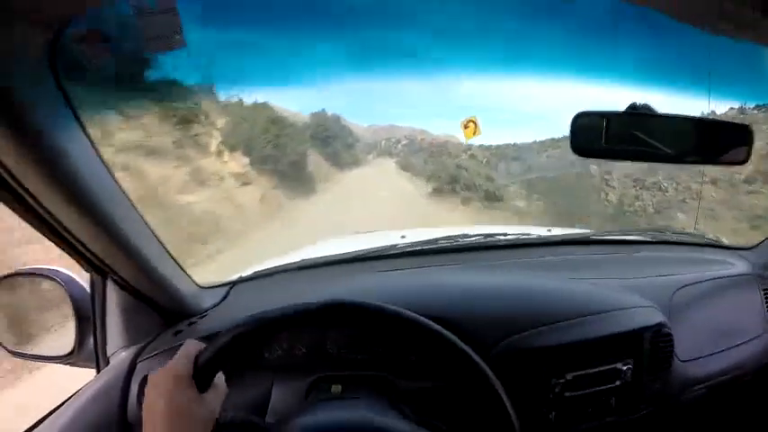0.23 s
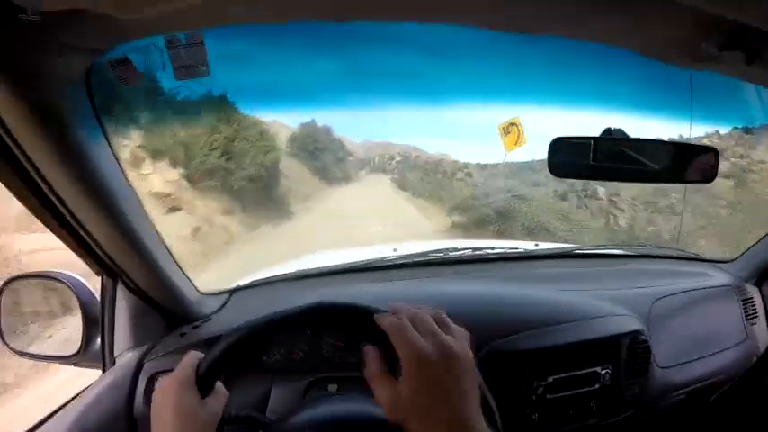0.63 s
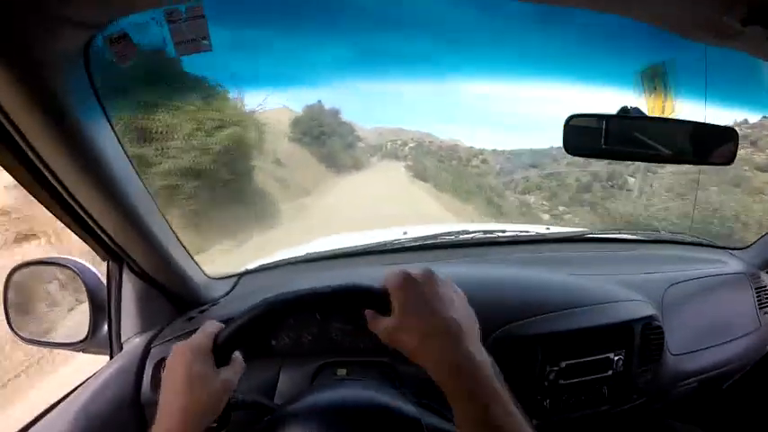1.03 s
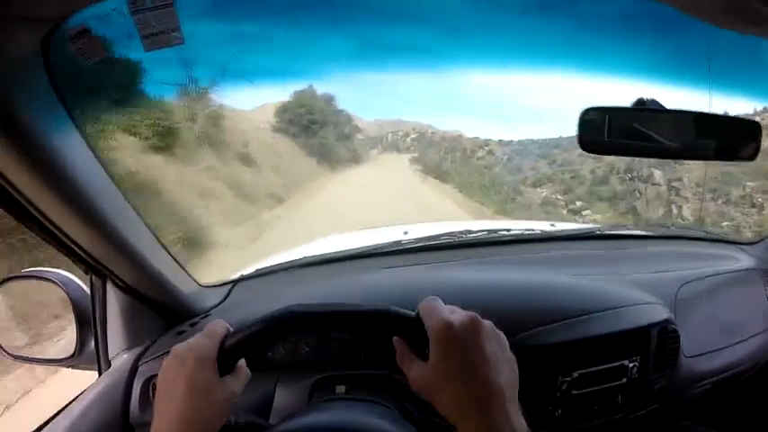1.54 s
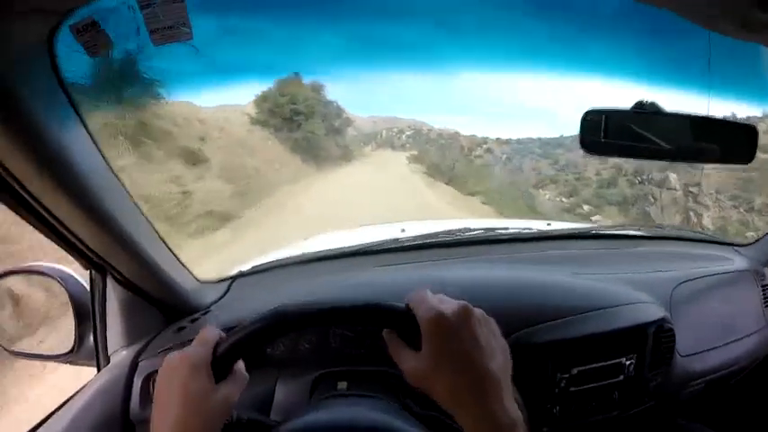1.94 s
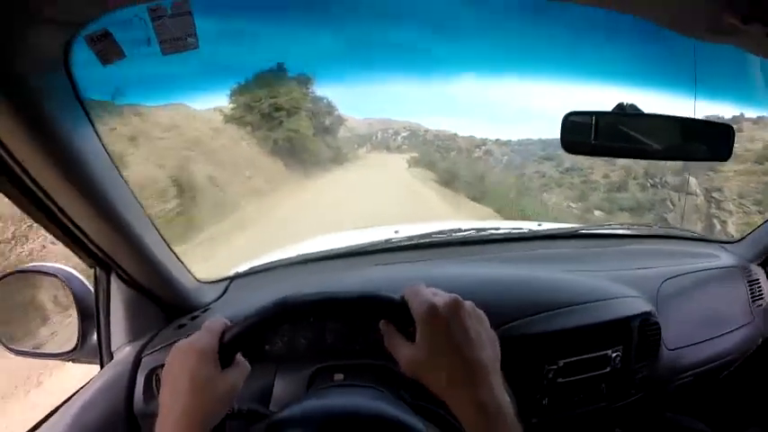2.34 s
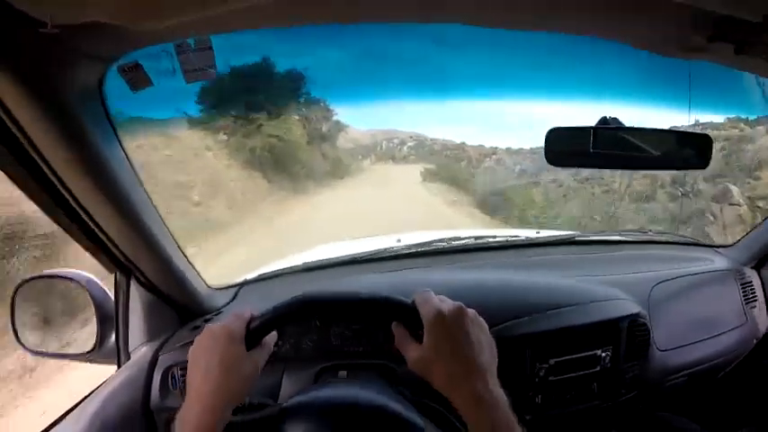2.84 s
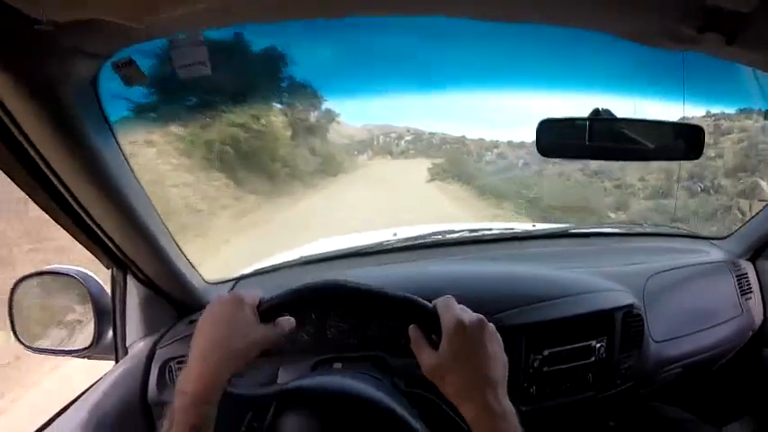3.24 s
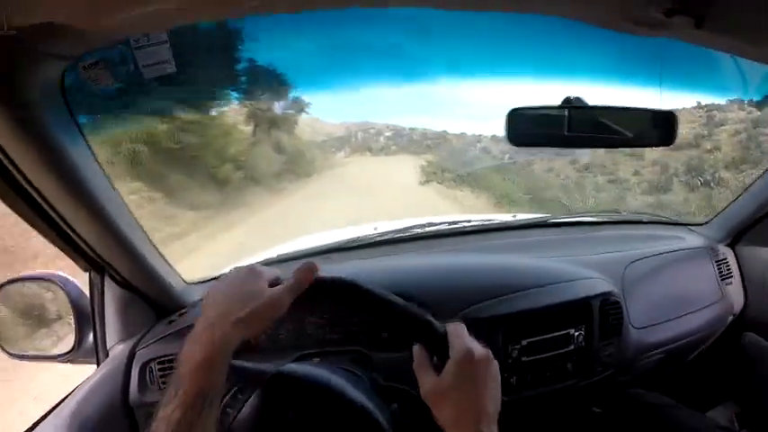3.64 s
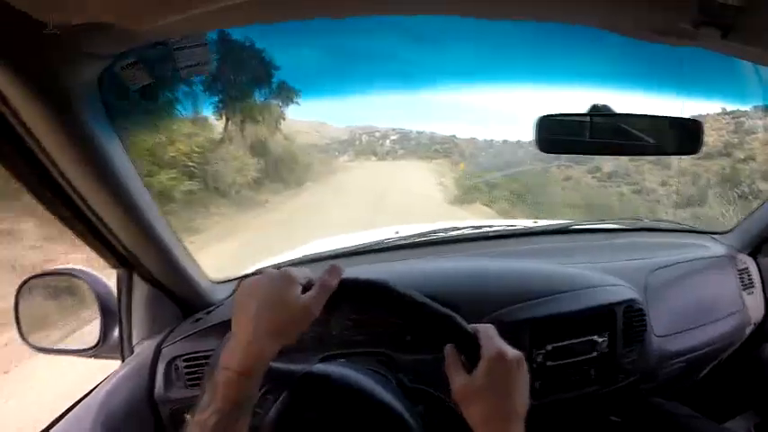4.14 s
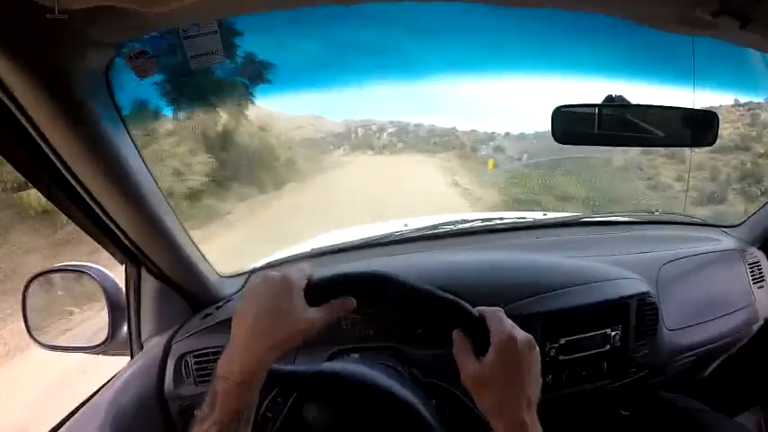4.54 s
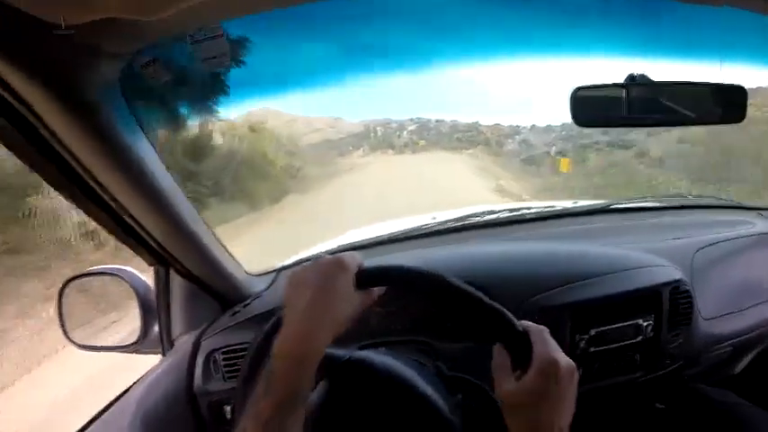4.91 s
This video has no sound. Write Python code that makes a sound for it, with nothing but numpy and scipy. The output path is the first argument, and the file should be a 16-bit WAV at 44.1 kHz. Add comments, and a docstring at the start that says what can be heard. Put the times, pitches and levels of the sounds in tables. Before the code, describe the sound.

Inside a pickup cab driving a dirt road, with a dry, close, bass-heavy sound. Low tyre rumble, muffled tread roar and faint gravel hiss run throughout, over a humming, slightly burbling engine and a swaying low body boom. A rut booms at 0.4 s; small metallic ticks and an occasional stone click follow. From 1.2 to 2 s comes the roughest patch: gravel roar swells, the body booms repeatedly, panels knock in a tight hollow clatter around 1.3-1.65 s, and dashboard plastic creaks and squeaks with fine crackling. Near 1.7-1.9 s the engine eases and drops in pitch. From 2 to 3.5 s it is calmer, with light ticks, a soft knock at 2.8 s and the engine rising slightly around 2.9 s. A strong boom hits at 3.6 s, then more at 3.9-4 s with short creaks. Knocks at 4.2, 4.6 and 4.9 s lead to a final run of creaks around 5 s.

```python
"""A plastic dashboard creaks in a pickup cab on a dirt road: noisy slip bursts ring resonances and carry a squeak.
Panels knock as resonant noise plus a sine; a loose part ticks, trim crackles in pings, stones click below.
An eight-cylinder engine hums in sine orders and sinks as it shifts up and eases off.
Ruts swell a low body boom, bumps drum the floor, and tyres rumble, roar and hiss as shaped noise."""
import sys
import numpy as np
from scipy import signal
from scipy.fft import rfft, irfft, next_fast_len
from scipy.io import wavfile
from scipy.ndimage import uniform_filter1d, minimum_filter1d, map_coordinates

SR = 44100
rng = np.random.default_rng(int(sys.argv[2]) if len(sys.argv) > 2 else 0)


def materialize(psi):
    """Save the field psi as 16-bit PCM at rate SR to the path in sys.argv[1].

    A 1-D psi becomes a single channel; in a 2-D psi each row is a channel.
    """
    bounded = np.clip(np.atleast_2d(psi).T, -1, 1)
    quanta = np.round(bounded * 32767).astype(np.int16)
    wavfile.write(sys.argv[1], SR, quanta)


N = 227952

# Ground under the tyres: t/s, tread roar level/dB, gravel hiss level/dB, axle rumble level/dB
ROAD_LEVELS = [(0, -32, -47.5, -25), (0.75, -33.5, -53, -23.5), (1.3, -28.5, -46.5, -21.5),
               (1.8, -32.5, -48, -24), (2.3, -35.5, -54.5, -23), (2.7, -37, -58, -24),
               (3.05, -34.5, -55, -24.5), (3.55, -35, -54, -26), (3.9, -34, -51.5, -22.5),
               (4.5, -35, -54.5, -25.5), (5.17, -34.5, -51, -23)]
# Loose gravel patches: t/s, length/s, rise of roar and hiss/dB
GRAVEL_PATCHES = [(1.453, 0.15, 5.5), (2.784, 0.034, 6), (3.535, 0.089, 5), (4, 0.15, 2.5), (4.59, 0.05, 3)]
GRAVEL_EDGE_S = 0.068
# Axle rumble spectrum: f/Hz, relative level/dB
RUMBLE_SPECTRUM = [(10, -60), (42, -11.5), (58, 3.5), (80, -2.5), (105, -5), (135, 1), (190, -5.5),
                   (260, -9), (350, -14.5), (500, -18.5), (900, -59), (2000, -120)]
# Tread roar spectrum, also the thud of knocks: f/Hz, relative level/dB
ROAR_SPECTRUM = [(150, -30.5), (330, 3.5), (480, 1), (650, 1), (820, 0.5), (990, 4.5), (1120, -1.5),
                 (1300, -8.5), (1700, -14), (2400, -17.5), (4000, -39), (8000, -62.5), (14000, -120)]
# Gravel hiss spectrum, also dry clicks: f/Hz, relative level/dB
HISS_SPECTRUM = [(700, -35), (2000, 4), (3300, 4), (5000, -1.5), (6500, -7), (8500, -14), (10000, -19),
                 (12000, -19.5), (15000, -50)]

# Steady rocking of the body: t/s, level/dB
ROCKING_LEVELS = [(0, -15), (0.2, -26.5), (0.5, -14.5), (2.0, -17), (2.35, -26.5), (2.5, -16.5),
                  (3.05, -18), (3.2, -24), (3.48, -22), (3.7, -12), (4.5, -12), (5.17, -18)]
# Ruts that make the body boom: peak t/s, level/dB
RUT_HITS = [(0.369, -9), (1.411, -8), (1.55, -6.5), (1.69, -8), (1.889, -9.5), (2.18, -22), (2.561, -17),
            (3.569, -4), (3.87, -9), (3.99, -5.5), (4.61, -7), (5.051, -11.5)]
RUT_RISE_DB_PER_S, RUT_FALL_DB_PER_S = 332, 136.5
# Body shudder spectrum: f/Hz, relative level/dB
SHUDDER_SPECTRUM = [
    (6, -25.5), (18, 7.0), (30, 2.0), (42, 5.0), (65, -7.5),
    (90, -14.0), (128, -12.0), (170, -20.0), (500, -66.5), (1000, -120)]
# Suspension bumps drumming the floor: t/s, level/dB, f/Hz
FLOOR_THUMPS = [(1.125, -18.5, 276), (1.46, -20, 303.3), (2.49, -26, 262), (4.05, -25, 306),
                (4.355, -23, 263)]

# Engine speed and load: t/s, cycle rate/Hz, level/dB
ENGINE_COURSE = [(0, 14.15, -28), (0.45, 14.25, -28), (0.75, 14.05, -28.5), (1.0, 13.75, -28),
                 (1.25, 13.4, -27.5), (1.55, 13.25, -27), (1.7, 12.9, -33), (1.87, 10.45, -35),
                 (2.3, 10.28, -36.5), (2.7, 10.2, -38), (2.9, 12.1, -39), (3.5, 11.7, -37),
                 (4.2, 11.05, -35), (5.17, 11.2, -38)]
# Orders from uneven cylinders: multiple of cycle rate, relative level/dB
BURBLE_ORDERS = [(4, 0), (5, 4), (6, -8), (7, -9.5), (9, -6), (10, -1), (11, 0.5), (12, -10), (13, -7),
                 (14, -13), (15, -8.5), (16, -12), (18, -12.5), (19, -15), (20, -18.5), (24, -18.5),
                 (27, -18), (29, -24.5)]
# Cab air resonances: f/Hz, width/Hz, gain/dB
CAB_AIR_MODES = [(114.13, 3.17, 10.5), (85.2, 4.9, 10.5)]
# Exhaust pipe resonances: f/Hz, width/Hz, gain/dB
PIPE_MODES = [(90.2, 4.4, 10.5), (250.6, 4.3, 6), (266, 6.3, 11)]

# Stones flicked at the underside: t/s, relative level/dB, ring f/Hz
STONE_HITS = [(0.219, -29, 3770), (0.996, -35.5, 3520), (2.0455, -36.5, 4086), (2.217, -34, 3510),
              (2.862, -36.5, 6800), (2.9482, -40.5, 5300), (3.547, -30, 3450), (4.598, -33, 3470)]
# Underfloor dulling: f/Hz, gain/dB
FLOOR_FILTER = [(7000, 0.5), (14000, -6)]

# Clear taps of the loose part: t/s, relative level/dB
CLEAR_TICKS = [(0.1394, -49), (0.379, -38.5), (0.516, -42), (0.551, -43.5), (0.589, -43), (0.613, -44),
               (0.782, -44), (0.9295, -38), (1.134, -34), (2.1, -41), (2.283, -42), (2.389, -45),
               (2.434, -43.5), (2.61, -42), (2.893, -45), (2.9725, -42), (3.087, -50), (3.133, -41),
               (3.236, -40.5), (3.272, -41.5), (3.518, -36.5), (3.7086, -41)]
FAINT_TICKS_PER_S, FAINT_TICK_DB = 6.3, -49.5
# Ring of the loose metal part: f/Hz, relative level/dB, t60/s
TRINKET_MODES = [(3220, 3, 0.03), (4430, -13.5, 0.014), (4960, -6.5, 0.018)]

# Panel knocks: t/s, relative level/dB, ring f/Hz, ring power share/1
PANEL_KNOCKS = [(0.997, -23, 1100, 0.7), (1.25, -22.5, 1060, 0.4), (1.285, -15.5, 933, 0.4),
                (1.341, -13.5, 1020, 0.8), (1.455, -18, 700, 0), (1.476, -7.5, 1095, .55),
                (1.5, -17.5, 1100, .3), (1.52, -8.5, 447, 0.5), (1.534, -15, 1150, 0.2),
                (1.549, -11.5, 1120, .4), (1.57, -13.5, 1105, 0.5), (1.617, -7.5, 1043, 0.7),
                (1.635, -13.5, 1116, .6), (2.785, -28.5, 1060, 0.6), (4.171, -20, 990, .4),
                (4.601, -21, 1105, 0.6), (4.878, -19.5, 995, 0.5), (5.088, -23, 1010, 0.6)]
# Padded panel resonances: f/Hz, width/Hz, relative level/dB
PANEL_MODES = [(302, 50, 6), (459, 97, 8.5), (730, 110, -2.5), (970, 71, 2.5), (1070, 56, 9.5),
               (1390, 110, -6.5), (1650, 130, -23.5)]

# Crackling of strained trim: t/s, length/s, relative level/dB
TRIM_STRAINS = [(1.238, 0.076, -41), (1.491, .13, -37), (1.638, 0.036, -46.5), (1.76, .11, -47.5),
                (4.967, .11, -44)]
# Crackle tone: f/Hz, gain/dB
CRACKLE_FILTER = [(700, -10), (1800, -3), (7000, -2.5), (14000, -13.5)]

# Dashboard creaks: t/s, rise/s, length before decay/s, relative level/dB, squeak f/Hz, squeak power share/1
CREAK_BURSTS = [(1.205, 0.026, 0.029, -27, 2335, 0.63), (1.243, 0.0036, .034, -37, 2290, .05),
                (1.281, 0.0089, .018, -30, 2038, 0.5), (1.319, .004, .009, -38, 2000, 0.5),
                (1.353, 0.0061, 0.023, -33.5, 2000, .15), (1.396, 0.014, 0.032, -33.5, 2350, 0.2),
                (1.443, 0.012, .023, -31.5, 2320, 0), (1.486, 0.0091, 0.027, -31.5, 3790, 0.5),
                (1.513, 0.0027, .024, -30.5, 3750, 0), (1.556, 0.0087, .02, -32.5, 3500, 0),
                (1.58, .005, 0.026, -35.5, 3750, 0.2), (1.603, 0.01, .018, -33, 2330, 0.4),
                (1.638, .01, 0.02, -30, 2330, .25), (1.661, 0.0033, 0.015, -37.5, 1990, .2),
                (1.705, 0.011, 0.016, -38.5, 3860, 0.2), (1.737, 0.0074, 0.019, -38, 3610, 0.3),
                (1.765, 0.0045, 0.023, -41, 3300, .12), (1.793, .012, 0.037, -40, 2530, .15),
                (1.829, 0.0064, 0.026, -35.5, 2450, .1), (1.853, 0.015, .018, -29.5, 3580, 0.1),
                (1.889, 0.021, 0.036, -37, 2290, 0.1), (1.96, 0.0082, .014, -33.5, 3450, .4),
                (3.941, 0.0037, 0.011, -36.5, 3535, 0.1), (3.967, .008, 0.013, -40.5, 2060, .15),
                (4.019, 0.0055, 0.011, -28, 1865, 0.4), (4.047, 0.0054, 0.021, -30.5, 2274, 0.4),
                (4.075, 0.0049, 0.017, -33.5, 2317, 0.3), (4.111, .003, .006, -46, 2230, 0.2),
                (4.168, 0.0038, 0.0074, -37.5, 3820, 0.3), (4.231, 0.0018, 0.0048, -39.5, 2200, .2),
                (4.251, .02, .027, -43, 3450, 0.2), (4.279, 0.011, .013, -32.5, 2014, 0.3),
                (4.319, .004, 0.0076, -40, 2180, .1), (4.353, .003, .007, -44, 2130, 0),
                (4.459, 0.0024, .007, -44, 2100, 0.3), (4.483, 0.0037, 0.0077, -44.5, 2130, .2),
                (4.838, 0.0016, .007, -44, 3800, 0), (4.86, 0.0072, 0.014, -41, 3930, 0.15),
                (4.894, .003, 0.0052, -43.5, 3730, 0), (4.929, .012, 0.02, -36, 2010, .2),
                (4.963, 0.0063, 0.022, -28.5, 2000, 0.6), (4.998, 0.0065, .016, -32, 3710, 0.4),
                (5.016, 0.01, 0.027, -34.5, 3900, .22), (5.047, 0.018, 0.025, -30, 3960, 0.4),
                (5.119, 0.0068, 0.02, -29.5, 2320, .13), (5.157, .005, .012, -37.5, 3690, 0.07)]
# Dashboard plastic resonances: f/Hz, width/Hz, mean level/dB
DASH_MODES = [(2060, 210, -1), (2270, 89, 2.5), (3290, 320, 0), (3705, 320, 7.5), (4000, 60, -4.5),
              (4640, 130, 4), (5360, 72, -11), (6330, 200, -17), (6820, 130, -7), (7980, 170, -10.5),
              (8500, 170, -17), (11830, 220, -31)]
# Rubbing plastic spectrum: f/Hz, relative level/dB
SCRAPE_SPECTRUM = [(400, -33), (1100, 8.5), (2200, 9.5), (2800, 0), (4200, -8.5), (6000, 0.5), (8300, -1),
                   (10000, -19), (12200, -23.5), (14000, -20), (15500, -42)]
# Dashboard tone: f/Hz, gain/dB
DASH_FILTER = [(5000, -1.0), (8000, -3.1), (12200, -1.5), (14000, -8), (15500, -27)]

TOP_HZ = 15200


def amp(db):
    """Decibels to gain."""
    return 10 ** (np.asarray(db) / 20)


def unit(x):
    """Scale to rms 1."""
    return x / np.sqrt(np.mean(x ** 2) + 1e-20)


def curves(rows):
    """Interpolate each column after the time to one value per sample."""
    s, *cols = np.transpose(rows)
    return [np.interp(np.arange(N) / SR, s, col) for col in cols]


def wobble(knots_per_s):
    """Smooth random curve through normally distributed knots."""
    knots = rng.standard_normal(int(N * knots_per_s / SR) + 4)
    return map_coordinates(knots, [np.arange(N) * knots_per_s / SR])


def sine(phase):
    """Sine of rms 1."""
    return np.sqrt(2) * np.sin(phase)


def phase_of(hz):
    """Integrate frequency to phase in radians."""
    return 2 * np.pi * np.cumsum(hz) / SR


def filtered(x, response):
    """Apply a complex frequency response."""
    size = next_fast_len(len(x) + 8192)
    spectrum = rfft(x, size) * response(np.fft.rfftfreq(size, 1 / SR))
    return irfft(spectrum, size)[:len(x)]


def coloured(x, points):
    """Filter by (f/Hz, level/dB) points, joined over log frequency."""
    f, db = np.transpose(points)
    return filtered(x, lambda hz: amp(np.interp(np.log(hz + 1), np.log(f), db)))


def resonate(x, modes):
    """Sum of band-pass resonances (f/Hz, width/Hz, level/dB)."""
    def response(f):
        return sum(amp(db) * 1j * f * w / (c * c - f * f + 1j * f * w) for c, w, db in modes)
    return filtered(x, response)


def swell(hz, modes):
    """Gain of a tone at hz inside (f/Hz, width/Hz, gain/dB) resonances."""
    return np.sqrt(sum(amp(db) ** 2 / (1 + (2 * (hz - c) / w) ** 2) for c, w, db in modes))


def noise(points):
    """Coloured noise of rms 1."""
    return unit(coloured(rng.standard_normal(N), points))


def add(track, s, sound):
    """Mix a sound into the track at time s."""
    part = track[max(round(s * SR), 0):][:len(sound)]
    part += sound[:len(part)]


def tyres(rumble_share=0.44, hiss_db=-1, lumps_db=1.36, grit_db=2):
    """Axle rumble, lumpy tread roar and gritty hiss are shaped noises that swell on loose gravel."""
    tread_db, gravel_db, axle_db = curves(ROAD_LEVELS)
    t = np.arange(N) / SR
    loose_db = np.zeros(N)
    for s, length_s, db in GRAVEL_PATCHES:
        inside_s = np.minimum(t - s, s + length_s - t)
        loose_db += db * np.clip(inside_s / GRAVEL_EDGE_S + 0.5, 0, 1)
    rumble = amp(axle_db + rumble_share * loose_db) * noise(RUMBLE_SPECTRUM)
    lumpy = unit(amp(lumps_db * wobble(70)) * noise(ROAR_SPECTRUM))
    gritty = unit(amp(grit_db * wobble(250)) * noise(HISS_SPECTRUM))
    roar = amp(tread_db + loose_db) * lumpy
    hiss = amp(gravel_db + loose_db + hiss_db) * gritty
    return rumble + roar + hiss


def jostle():
    """Body motion: steady rocking plus, at each rut, a quick swell and slower fall."""
    rocking_db, = curves(ROCKING_LEVELS)
    t = np.arange(N) / SR
    power = amp(rocking_db) ** 2
    for s, db in RUT_HITS:
        drop_db = np.maximum(RUT_RISE_DB_PER_S * (s - t), RUT_FALL_DB_PER_S * (t - s))
        power += amp(db - drop_db) ** 2
    return np.sqrt(power)


def body(boom_hz=31.73, drift_hz=6, shudder_db=-2.0, drone_hz=58, drone_drift_hz=2, drone_db=-13):
    """The cab sways on its mounts at one low, drifting resonance; shudder noise and a low drifting drone join
    it."""
    sway = sine(phase_of(boom_hz + drift_hz * wobble(10)))
    shudder = noise(SHUDDER_SPECTRUM)
    drone = sine(phase_of(drone_hz + drone_drift_hz * wobble(11)))
    return jostle() * unit(sway + amp(shudder_db) * shudder + amp(drone_db) * drone)


def thumps(rise_s=0.014, t60_s=0.14, floor_width_hz=30):
    """Each suspension bump swells and dies in one low, wavering floor resonance."""
    out, t = np.zeros(N), np.arange(SR // 4) / SR
    for s, db, hz in FLOOR_THUMPS:
        phase = phase_of(hz + floor_width_hz / 2 * wobble(68.5)[:len(t)])
        swing = (1 - np.exp(-t / rise_s)) ** 2 * amp(-60 * t / t60_s)
        tone = np.sin(phase + rng.uniform(0, 2 * np.pi))
        add(out, s, amp(db) * swing / swing.max() * tone)
    return out


def engine(burble_db=-2, waver_db=1.26, phase_waver_rad=0.021):
    """Eight firings a cycle hum through cab air resonances; unequal cylinders add pipe-lifted orders."""
    cycle_hz, load_db = curves(ENGINE_COURSE)
    angle = phase_of(cycle_hz)

    def tone(order):
        """One engine order with random start and slight phase waver."""
        return sine(order * angle + rng.uniform(0, 2 * np.pi) + phase_waver_rad * wobble(5.6))

    hum = swell(8 * cycle_hz, CAB_AIR_MODES) * tone(8)
    burble = np.zeros(N)
    for order, db in BURBLE_ORDERS:
        lift = 1 + swell(order * cycle_hz, PIPE_MODES)
        burble += amp(db + waver_db * wobble(5.4)) * lift * tone(order)
    return amp(load_db) * (hum + amp(burble_db) * burble)


def stones(click_db=-11, t60_s=0.032, width_hz=450, attack_s=0.00053):
    """Each stone is a dry noise click with a brief ring, dulled by the floor."""
    out, t = np.zeros(N), np.arange(SR // 20) / SR
    for s, db, hz in STONE_HITS:
        crack = rng.standard_normal(len(t))
        ring = unit(resonate(crack, [(hz, width_hz, 0)]))
        click = unit(coloured(crack, HISS_SPECTRUM)) + ring
        envelope = amp(db + click_db - 60 * t / t60_s) * (1 - np.exp(-t / attack_s))
        add(out, s, envelope * click)
    return coloured(out, FLOOR_FILTER)


def faint_ticks(spread_db=4.0):
    """Random faint taps of the trembling loose part: (t/s, relative level/dB)."""
    draws = rng.random((round(FAINT_TICKS_PER_S * N / SR), 2))
    return [(when * N / SR, FAINT_TICK_DB + spread_db * (2 * size - 1)) for when, size in draws]


def ticks(tick_db=-3, attack_s=0.0003, click_db=-7, click_t60_s=0.015, detune=0.021):
    """The loose metal part taps: a dry noise click and a few fast-decaying sines."""
    out, t = np.zeros(N), np.arange(SR // 12) / SR
    for s, db in CLEAR_TICKS + faint_ticks():
        ring = np.zeros(len(t))
        for hz, level_db, t60_s in TRINKET_MODES:
            mode_hz = hz * rng.normal(1, detune)
            ring += amp(level_db - 60 * t / t60_s) * np.sin(2 * np.pi * mode_hz * t)
        dry_click = unit(coloured(rng.standard_normal(len(t)), HISS_SPECTRUM))
        click = amp(click_db - 60 * t / click_t60_s) * dry_click
        add(out, s, amp(db + tick_db) * (ring + click) * (1 - np.exp(-t / attack_s)))
    return out


def knocks(knock_db=-5, attack_s=0.0017, t60_s=0.058, detune=0.068, judder_db=4.5, thud_db=-5):
    """A padded panel judders on its frame: broad resonant crunch plus a ring that depends on the spot."""
    out, t = np.zeros(N), np.arange(SR // 6) / SR
    for s, db, hz, share in PANEL_KNOCKS:
        judder = rng.standard_normal(len(t)) * amp(judder_db * wobble(400)[:len(t)])
        modes = [(c * rng.normal(1, detune), w, level_db) for c, w, level_db in PANEL_MODES]
        panel = unit(resonate(judder, modes))
        thud = unit(coloured(judder, ROAR_SPECTRUM))
        crunch = unit(panel + amp(thud_db) * thud)
        ring = sine(2 * np.pi * hz * t)
        envelope = amp(db + knock_db - 60 * t / t60_s) * (1 - np.exp(-t / attack_s))
        add(out, s, envelope * (np.sqrt(1 - share) * crunch + np.sqrt(share) * ring))
    return out


def crackle(pings_per_s=420, centre_hz=3100, spread=0.433, cycles=5, size_db=4):
    """Strained trim slips at many contact points, each a tiny ping of random pitch and size."""
    out, t = np.zeros(N), np.arange(SR // 60) / SR
    for s, length_s, db in TRIM_STRAINS:
        patch = np.zeros(round(length_s * SR))
        for when, pitch, size in rng.random((round(pings_per_s * length_s), 3)):
            hz = centre_hz * np.exp(2 * spread * (2 * pitch - 1))
            ping = np.sin(2 * np.pi * hz * t) * np.exp(-hz * t / cycles)
            ping_db = size_db * min(-np.log(1 - size), 3)
            add(patch, when * length_s, amp(ping_db) * ping)
        add(out, s, amp(db) * unit(patch))
    return coloured(out, CRACKLE_FILTER)


def dashboard(slips_per_s=1200, scatter_db=4, hiss_gain=1.02, vary_db=5.0, detune=0.038, scrape_db=-3,
              creak_db=1, squeak_db=1, tail_s=0.0078, jitter=0.1, bend=0.01, chatter_db=2,
              second_db=-11, third_db=-20):
    """Each stick-slip creak is a run of tiny slips ringing the plastic, partly locked into a squeak."""
    out, t = np.zeros(N), np.arange(SR // 12) / SR
    for s, rise_s, length_s, db, hz, share in CREAK_BURSTS:
        # friction builds up, then the joint lets go
        grip = np.clip(t / rise_s, 0, 1) * np.exp(-np.maximum(t - length_s, 0) / tail_s)
        sizes = amp(scatter_db * rng.standard_normal(len(t)))
        train = (rng.random(len(t)) < slips_per_s / SR) * sizes
        slips = unit(train - train.mean()) + hiss_gain * rng.standard_normal(len(t))
        # every contact point favours other modes
        modes = [(c * rng.normal(1, detune), w, level_db + vary_db * rng.standard_normal())
                 for c, w, level_db in DASH_MODES]
        ring = unit(resonate(slips, modes))
        scrape = unit(coloured(slips, SCRAPE_SPECTRUM))
        rub = unit(ring + amp(scrape_db) * scrape)
        # slow bend plus per-sample jitter roughens the pitch
        phase = phase_of(hz * (1 + bend * wobble(90)[:len(t)] + jitter * rng.standard_normal(len(t))))
        harmonics = sine(phase) + amp(second_db) * sine(2 * phase) + amp(third_db) * sine(3 * phase)
        # the second grip factor keeps the squeak to firm contact
        squeak = grip * harmonics
        creak = amp(creak_db) * np.sqrt(1 - share) * rub + amp(squeak_db) * np.sqrt(share) * squeak
        add(out, s, amp(db) * grip * creak)
    return coloured(out * amp(chatter_db * wobble(300)), DASH_FILTER)


def cab(x, wet_db=-10, t60_s=0.028):
    """Glass and seats give a very short echo, a decaying noise tail."""
    t = np.arange(SR // 8) / SR
    tail = rng.standard_normal(len(t)) * amp(-60 * t / t60_s) * (t > 0.002)
    return x + amp(wet_db) * signal.fftconvolve(x, tail / np.linalg.norm(tail))[:N]


def scene():
    """Road, body and engine stay dry; trim and stones get the cab echo."""
    background = tyres() + body() + thumps() + engine()
    close = stones() + ticks() + knocks() + crackle() + dashboard()
    return (background + cab(close))[None]


def record(dry, ceiling=0.85, hold_s=0.0088):
    """Ease the gain down around peaks above the ceiling, then cut everything from TOP_HZ up."""
    span = round(hold_s * SR)
    needed = np.minimum(1, ceiling / (np.abs(dry[0]) + 1e-9))
    gain = uniform_filter1d(minimum_filter1d(needed, 2 * span), span)
    return filtered(dry[0] * gain, lambda hz: hz < TOP_HZ)[None]


dry = scene()
out = record(dry)
materialize(out)
```